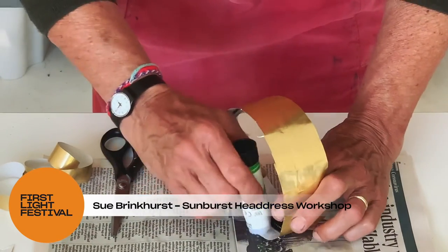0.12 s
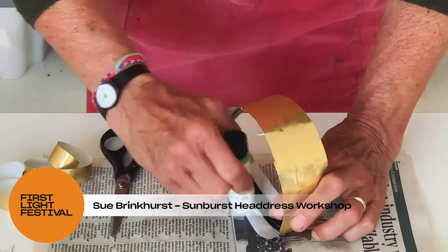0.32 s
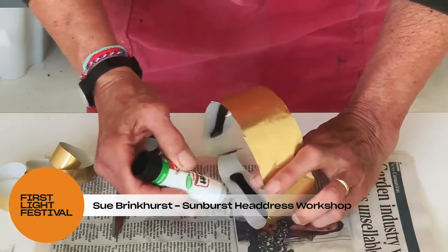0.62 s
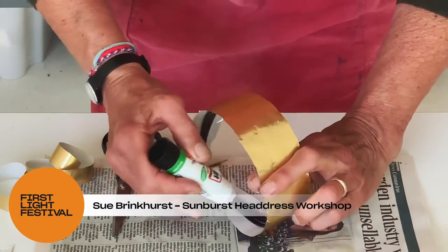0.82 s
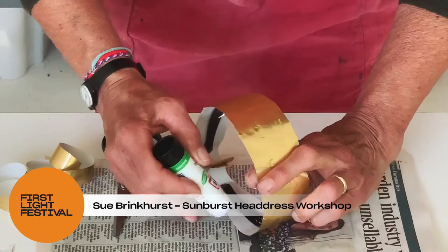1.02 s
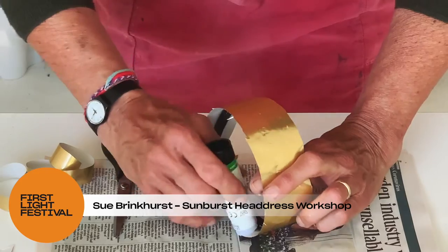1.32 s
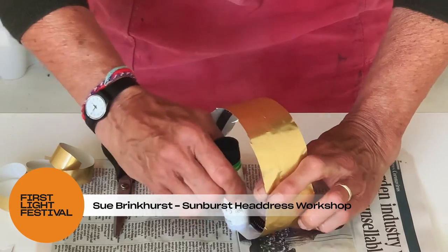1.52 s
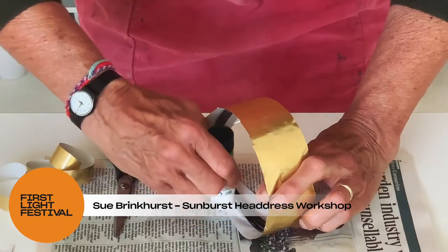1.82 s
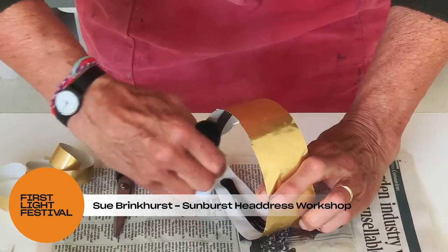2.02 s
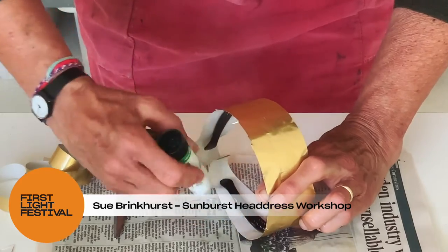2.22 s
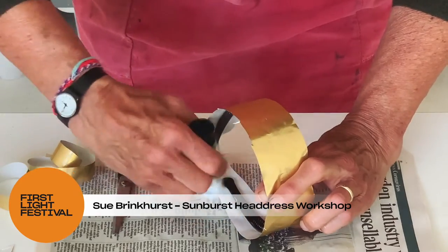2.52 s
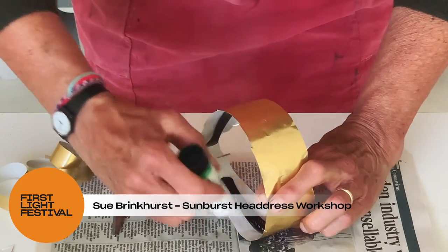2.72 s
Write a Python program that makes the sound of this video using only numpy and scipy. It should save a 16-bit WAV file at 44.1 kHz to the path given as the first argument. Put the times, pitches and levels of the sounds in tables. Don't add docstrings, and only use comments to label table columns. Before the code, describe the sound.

Foil paper crackles as it is handled: a bright, sharp burst at 0.2 s, smaller snaps at 0.3, 0.45 and 0.7 s. From 1.0 to 1.8 s only faint glue-stick rubbing and tiny ticks. A crisp crackle with buzzing at 1.87 s, a short squeaky scrape near 2.3 s, then clustered dull table thumps at 2.43-2.55 s and light rustle. Close, quiet room, faint low hum.

```python
import sys
import numpy as np
from scipy import signal
from scipy.fft import rfft, irfft, next_fast_len
from scipy.io import wavfile

SR = 44100
rng = np.random.default_rng(int(sys.argv[2]) if len(sys.argv) > 2 else 0)


def generate_wav(signal):
    frames = np.transpose(np.atleast_2d(signal))
    scaled = np.clip(frames, -1, 1) * 32767
    pcm = np.round(scaled).astype(np.int16)
    wavfile.write(sys.argv[1], SR, pcm)


def linear_from_db(decibels):
    return 10 ** (np.asarray(decibels, float) / 20)


N = 125685

# hz, density_db_per_hz
AIR_SPECTRUM = [(25, -7.5), (50, -25.5), (85, 1), (170, -13.5), (300, -32), (520, -26.5), (3700, -45.5),
                (15000, -51)]
AIR_LEVEL_DB = -56.5
# time_s, pitch_hz, level_db
DRONE_PATH = [(0, 108.3, -37), (.1, 105, -66), (.51, 105, -48.5), (.63, 105, -63.5), (0.688, 107.7, -47),
              (.82, 108.2, -58), (.96, 105.6, -53.5), (1.07, 109.1, -75), (1.15, 106.7, -44.5),
              (1.23, 105.5, -50), (1.32, 105, -43.5), (1.8, 105, -71), (1.96, 105, -46), (2.15, 101.7, -53),
              (2.23, 108.3, -43), (2.4, 105, -64.5), (2.68, 105, -44.5), (2.85, 109.5, -60.5)]
DRONE_FLICKER_DB, DRONE_WANDER_RAD = 7.5, 0.97
# hz, t60_s
ROOM_DECAY = [(200, 0.4), (1000, 0.39), (4000, 0.37), (12000, 0.11)]
ROOM_LEVEL_DB, SNAP_SEND_DB, TABLE_SEND_DB = 3.5, -14, -7
# hz, correlation
STEREO_LIKENESS = [(60, 0.4), (250, 0.93), (600, 0.1), (5000, 0.011)]
HALF_OCTAVE_EDGES_HZ = 22 * 2 ** np.arange(0, 9.6, .5)
# start_s, peak_db
HAND_THUMPS = [
    (1.874, -35),
    (2.426, -21),
    (2.441, -22.5),
    (2.463, -21),
    (2.476, -24.5),
    (2.496, -26.5),
    (2.525, -38),
    (2.545, -33.5),
]
# pitch_hz, level_db, t60_s
TABLE_MODES = [(105, -12, 0.5), (133, 5, 0.04), (208.5, -2.5, 0.12), (269.4, -1, .11), (353, -8.5, 0.078),
               (431.3, -8.5, 0.1), (543, -16, 0.043), (737, -23.5, 0.044)]
TABLE_LOW_HZ, TABLE_HIGH_HZ = 80, 905
# time_s, pitch_hz, level_db
TIP_SLIDES = [
    [(1.03, 3600, -102.5), (1.08, 3600, -105), (1.2, 3320, -81), (1.33, 4077, -72.5), (1.6, 4245, -84),
     (1.66, 4250, -94)],
    [(1.62, 6500, -93), (1.67, 6700, -78.5), (1.8, 7170, -80.5), (1.85, 7000, -97), (1.87, 7180, -92)],
    [(2.27, 4020, -83.5), (2.3, 3850, -64.5), (2.325, 3700, -56), (2.37, 3660, -70), (2.39, 3720, -68.5),
     (2.43, 3650, -68), (2.47, 3700, -83), (2.49, 3750, -90)],
    [(2.16, 4630, -104), (2.22, 4756, -72.5), (2.33, 4710, -66.5), (2.4, 4890, -93.5)],
    [(2.25, 1950, -85), (2.29, 1980, -68), (2.33, 1900, -78), (2.36, 1900, -74), (2.42, 1837, -77.5),
     (2.48, 1850, -65)],
]
TIP_WIDTHS_HZ = [800, 600, 120, 1200, 600]
# start_s, t60_s, pitch_hz, width_hz,
# level_db
STRIP_BUZZES = [(.199, 0.27, 1291, 270, -42), (0.216, 0.23, 735, 40, -47), (0.6, 0.15, 520.7, 250, -53),
                (0.688, 0.3, 3766, 330, -50), (.69, 0.26, 1500, 700, -60.5),
                (0.689, 0.21, 5490, 500, -55.5), (0.69, 0.46, 2795, 460, -58), (.691, .4, 4540, 500, -59),
                (.925, 0.071, 3098, 830, -54), (1.3, 1, 75.7, 24, -55), (1.866, 0.8, 1168, 200, -51.5),
                (1.869, 0.2, 260, 29.7, -46), (1.866, 0.58, 4708, 450, -44.5),
                (1.868, 0.85, 3794, 300, -51), (1.866, 0.33, 7480, 500, -44.5),
                (1.903, 0.19, 4430, 1800, -47.5), (2.018, 0.067, 2990, 2000, -53.5),
                (1.866, 0.44, 5730, 600, -45.5)]
BUZZ_ATTACK_S, DAMPED_AFTER_S = 0.0025, 0.24
# start_s, peak_db, pitch_hz, ring_cycles
CREASE_SNAPS = [(.06, -53.5, 1250, 22), (0.11, -55, 1040, 12), (0.137, -45.5, 1000, 4.9),
                (.205, -22.5, 2540, 36), (0.2085, -28.5, 4700, 20), (0.2135, -18.5, 10100, 30),
                (0.1981, -30, 1350, 15), (0.215, -16.5, 10550, 27), (0.2197, -9, 10430, 41),
                (0.2204, -9.5, 13100, 18), (0.2225, -28, 4360, 12), (0.2221, -25.5, 1360, 6.3),
                (0.2333, -23.5, 4650, 20), (.227, -16, 10500, 9.6), (.2385, -20, 10400, 22),
                (0.3006, -19.5, 2280, 22), (0.307, -21.5, 2600, 4.6), (0.4431, -36, 1310, 24),
                (0.4435, -34.5, 2950, 28), (0.4765, -29, 2510, 20), (0.479, -35, 1120, 8.4),
                (0.5942, -44, 3070, 5.2), (0.6889, -20, 4050, 5.4), (0.6886, -43, 1320, 9.2),
                (.6915, -53, 721, 27), (0.6918, -30, 2840, 20), (1.555, -42, 11270, 13.5),
                (1.589, -42.5, 2096, 82), (1.8638, -15, 12950, 44), (1.8656, -17.5, 7740, 19.4),
                (1.865, -28.5, 10200, 13), (1.8715, -17, 12900, 20), (1.866, -24.5, 2300, 16),
                (1.867, -28.5, 1100, 8.7), (1.882, -33, 7300, 14), (1.9091, -25, 3750, 8.5),
                (1.9117, -24, 10500, 7.6), (1.917, -20, 4600, 12), (1.919, -32, 3700, 13),
                (1.929, -37, 1060, 9), (2.0205, -27, 3300, 2.4), (2.024, -44, 1390, 5.3),
                (2.4658, -43.5, 10400, 16), (2.4917, -34, 13100, 16), (2.511, -44.5, 6760, 15),
                (2.5473, -35, 3480, 6), (2.547, -37.5, 1100, 1.7), (2.548, -33, 12500, 20),
                (2.599, -39, 3660, 9), (2.8445, -32, 2550, 12), (2.846, -40.5, 1383, 10)]
CRACK_DB, CRACK_S = -27.5, 0.0016
# start_s, length_s, level_db, fall_db, tilt_db_per_octave
FOIL_FLEXES = [(.0, 0.19, -77, 4, -17), (0.196, 0.043, -39.5, 3, 3.5), (0.244, 0.12, -39.5, 10.5, -1),
               (0.423, 0.16, -51.5, 18.5, -12.5), (.588, 0.073, -46, 33, -3.5),
               (0.678, 0.24, -59.5, 18, -7.5), (0.905, 0.046, -73.5, -11.5, 2.5),
               (0.954, 0.035, -64.5, 14, 2.5), (1.139, 0.023, -77, 6, 7), (1.307, 0.018, -63.5, 18, 5.5),
               (1.367, 0.0098, -67.5, 7.5, 9), (1.446, 0.023, -54, 20, 0), (1.527, 0.0082, -69.5, -6, 1.5),
               (1.548, 0.054, -67.5, 11.5, 8), (1.582, 0.19, -69.5, 8.5, -6), (1.762, 0.019, -78, -5, 10.5),
               (1.771, 0.032, -71, 26.5, 10.5), (1.86, 0.1, -43, 17, 8), (1.951, 0.17, -51.5, 8, 3),
               (2.457, 0.047, -71.5, -17.5, 7), (2.501, 0.049, -51.5, 1.5, 6), (2.583, 0.064, -50, 18.5, 5)]
RUSTLE_ATTACK_S, RUSTLE_RELEASE_S = 0.0027, 0.0037
GRAINS_PER_S, GRAIN_SPREAD_DB, GRAIN_CYCLES = 9000, 1.5, 2.98
# hz, density_db_per_hz
FOIL_SPECTRUM = [(600, -37), (1200, -8), (1800, -4.5), (2900, -1.5), (4500, 8), (7000, -8.5), (13000, 1.5),
                 (16000, -12)]
FOIL_LOW_HZ = 479
PORTS_FROM_HZ, PORT_NULL_HZ, PORT_STEP_HZ, PORT_SHARE = 6000, 8600, 3250, 1
MIC_TOP_HZ, CUTOFF_HZ = 14600, 16500


def rms_one(x):
    return x / np.sqrt(np.mean(x ** 2) + 1e-20)


def at_hz(points, hz):
    points_hz, values = np.transpose(points)
    return np.interp(np.log(hz), np.log(points_hz), values)


def drift(rate_hz):
    pole = np.exp(-80 * np.pi * rate_hz / SR)
    white = rng.standard_normal(N // 40 + 2002)
    slow = signal.lfilter([1], [1, -2 * pole, pole * pole], white)[2000:]
    return np.interp(np.arange(N) / 40, np.arange(len(slow)), rms_one(slow - slow.mean()))


def ring(clicks, hz, t60_s):
    radius = linear_from_db(-60 / (t60_s * SR))
    w = 2 * np.pi * min(hz, .45 * SR) / SR
    return signal.lfilter([0, np.sin(w)], [1, -2 * radius * np.cos(w), radius * radius], clicks + 1e-18)


def bandpass(x, low_hz, high_hz):
    return signal.sosfilt(signal.butter(2, [low_hz, high_hz], "band", fs=SR, output="sos"), x)


def stereo_bands(length):
    white = rng.standard_normal((2, 2, length))
    for k, (low_hz, high_hz) in enumerate(zip(HALF_OCTAVE_EDGES_HZ, HALF_OCTAVE_EDGES_HZ[1:])):
        mid, side = bandpass(white[k % 2], low_hz, high_hz)
        hz = np.sqrt(low_hz * high_hz)
        alike = np.clip(at_hz(STEREO_LIKENESS, hz), 0, 1)
        yield hz, np.sqrt(1 + alike) * mid + np.sqrt(1 - alike) * side * [[1], [-1]]


def narrow_noise(hz, width_hz):
    lowpass = signal.butter(2, width_hz / 2, fs=SR, output="sos")
    a, b = signal.sosfilt(lowpass, rng.standard_normal((2, N)))
    phase = 2 * np.pi * np.cumsum(hz * np.ones(N)) / SR
    return rms_one(a * np.cos(phase) + b * np.sin(phase))


def air():
    noise = 0
    for hz, band in stereo_bands(N):
        noise = noise + band * linear_from_db(at_hz(AIR_SPECTRUM, hz) + 4.3 * drift(5))
    return linear_from_db(AIR_LEVEL_DB) * rms_one(noise)


def drone():
    s, hz, db = np.transpose(DRONE_PATH)
    t = np.arange(N) / SR
    phase = 2 * np.pi * np.cumsum(np.interp(t, s, hz)) / SR + DRONE_WANDER_RAD * drift(3.7)
    level = linear_from_db(np.interp(t, s, db) + DRONE_FLICKER_DB * drift(4.1))
    return np.sqrt(2) * level * np.sin(phase)


def room(x):
    t = np.arange(SR) / SR
    tail = 0
    for hz, band in stereo_bands(SR):
        t60_s = at_hz(ROOM_DECAY, hz)
        tail = tail + band * linear_from_db(-60 * t / t60_s) / np.sqrt(t60_s)
    tail = tail * np.clip((t - .002) / 0.0022, 0, 1)
    tail = tail / np.sqrt((tail ** 2).sum() / 2)
    return linear_from_db(ROOM_LEVEL_DB) * signal.fftconvolve(x[None], tail, axes=1)[:, :N]


def table_thumps():
    s, db = np.transpose(HAND_THUMPS)
    luck_db = 2 * rng.standard_normal((len(s), len(TABLE_MODES)))
    out = 0
    for k, (hz, level_db, t60_s) in enumerate(TABLE_MODES):
        clicks = np.zeros(N)
        clicks[(s * SR).astype(int)] = linear_from_db(db + level_db - 8.5 + luck_db[:, k])
        out = out + ring(clicks, hz, t60_s) * (-1) ** k
    return bandpass(out, TABLE_LOW_HZ, TABLE_HIGH_HZ)


def tip_slides():
    t, out = np.arange(N) / SR, 0
    for rows, width_hz in zip(TIP_SLIDES, TIP_WIDTHS_HZ):
        s, hz, db = np.transpose(rows)
        level = linear_from_db(np.interp(t, s, db, -140, -140))
        out = out + level * narrow_noise(np.interp(t, s, hz), width_hz)
    return out


def strip_buzzes():
    t, out = np.arange(N) / SR, 0
    for s, t60_s, hz, width_hz, db in STRIP_BUZZES:
        decay = linear_from_db(db - 60 * np.maximum(t - s, 0) / t60_s)
        attack = np.clip((t - s) / BUZZ_ATTACK_S, 0, 1)
        damping = np.exp(-20 * np.maximum(t - s - DAMPED_AFTER_S, 0))
        out = out + decay * attack * damping * narrow_noise(hz, width_hz)
    return out


def crease_snaps():
    length = 2000
    out, t = np.zeros(N + length), np.arange(length) / SR
    for (s, db, hz, cycles), white in zip(CREASE_SNAPS, rng.standard_normal((60, length))):
        noise = bandpass(white, hz / 1.5, min(1.595 * hz, .45 * SR))
        burst = noise * t / CRACK_S * np.exp(-2 * t / CRACK_S)
        tone = ring(burst * (t < CRACK_S), hz, cycles / hz)
        crack = ring(burst, hz, 1.4 / hz)
        snap = tone / np.abs(tone).max() + linear_from_db(CRACK_DB) * crack / np.abs(crack).max()
        start = int(s * SR)
        out[start:start + length] += linear_from_db(db) * snap
    return out[:N]


def foil_rustle():
    t, pitches_hz = np.arange(N) / SR, np.geomspace(450, 15500, 26)
    sizes = linear_from_db(GRAIN_SPREAD_DB * np.minimum(rng.exponential(1, N), 4)) * rng.choice([-1, 1], N)
    sizes = sizes * (rng.random(N) < GRAINS_PER_S / SR) * linear_from_db(4.1 * drift(90))
    dealt = rng.integers(0, len(pitches_hz), N)
    shapes = []
    for s, length_s, db, fall_db, _ in FOIL_FLEXES:
        level = linear_from_db(db - fall_db * np.clip((t - s) / length_s, 0, 1))
        attack = np.clip((t - s) / RUSTLE_ATTACK_S, 0, 1)
        release = np.exp(-np.maximum(t - s - length_s, 0) / RUSTLE_RELEASE_S)
        shapes.append(level * attack * release)
    shapes = np.array(shapes)
    tilts = np.array(FOIL_FLEXES)[:, 4]
    total = sum(linear_from_db(at_hz(FOIL_SPECTRUM, hz)) ** 2 * hz for hz in pitches_hz)
    out = 0
    for k, hz in enumerate(pitches_hz):
        grains = rms_one(ring(sizes * (dealt == k), hz, GRAIN_CYCLES / hz))
        share = linear_from_db(at_hz(FOIL_SPECTRUM, hz)) * np.sqrt(hz / total)
        envelope = linear_from_db(tilts * np.log2(hz / 4000)) @ shapes
        out = out + grains * share * envelope
    return out


def scene():
    foil_highpass = signal.butter(4, FOIL_LOW_HZ, "high", fs=SR, output="sos")
    rustle, snaps = signal.sosfilt(foil_highpass, [foil_rustle(), crease_snaps()])
    soft = rustle + tip_slides() + strip_buzzes()
    thumps = table_thumps()
    wet = room(soft + linear_from_db(SNAP_SEND_DB) * snaps + linear_from_db(TABLE_SEND_DB) * thumps)
    thumps_stereo = thumps * linear_from_db([[-1.5], [1.5]])
    return soft + snaps + wet + thumps_stereo + drone() + air()


def band_limit(x):
    return signal.sosfilt(signal.butter(12, 16470, fs=SR, output="sos"), x)


def record(dry):
    size = next_fast_len(N + 4000)
    hz, wide = np.fft.rfftfreq(size, 1 / SR), rfft(dry, size, axis=1)
    share = PORT_SHARE / (1 + (PORTS_FROM_HZ / (hz + 1)) ** 20)
    shared = share * wide[0] + (1 - share) * wide
    late_rad = np.pi * (.5 + (hz - PORT_NULL_HZ) / PORT_STEP_HZ) * np.clip((hz - 1500) / 2000, 0, 1)
    ports = shared * np.exp(1j * late_rad * np.array([[-1], [1]]))
    ports = ports / np.sqrt(1 + (hz / MIC_TOP_HZ) ** 20)
    lowpass = signal.cheby2(12, 70, CUTOFF_HZ, fs=SR, output="sos")
    mix = signal.sosfilt(lowpass, irfft(ports, size, axis=1)[:, :N])
    return band_limit(mix)


dry = scene()
out = record(dry)
generate_wav(out)
```